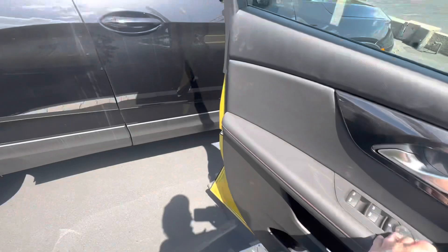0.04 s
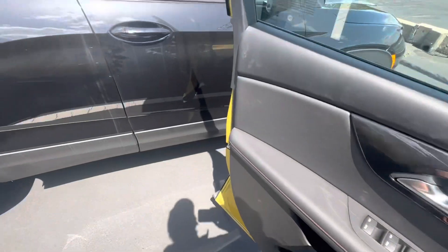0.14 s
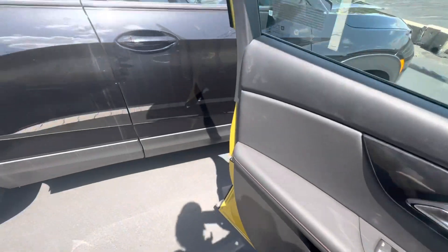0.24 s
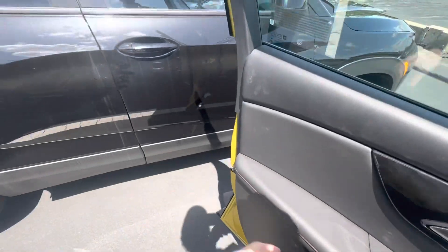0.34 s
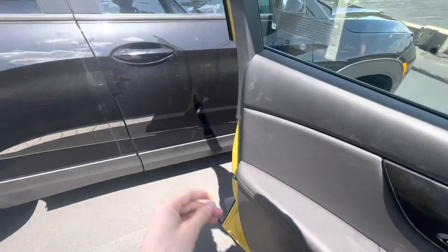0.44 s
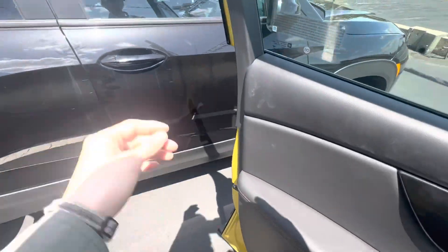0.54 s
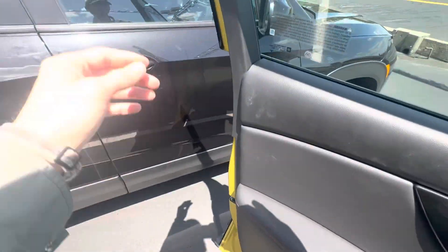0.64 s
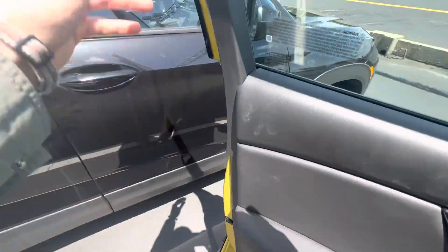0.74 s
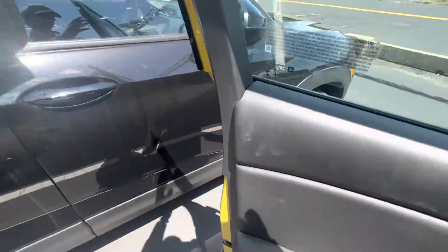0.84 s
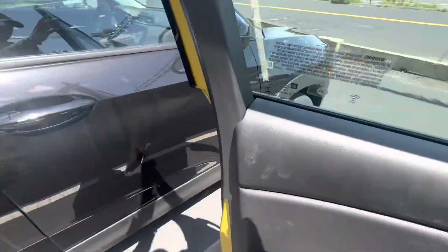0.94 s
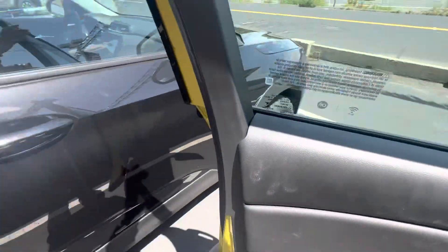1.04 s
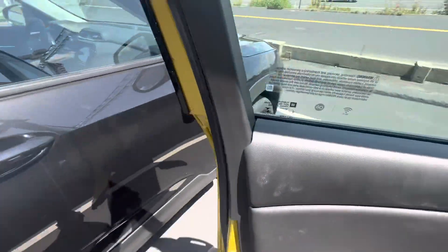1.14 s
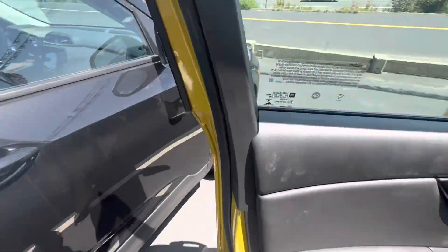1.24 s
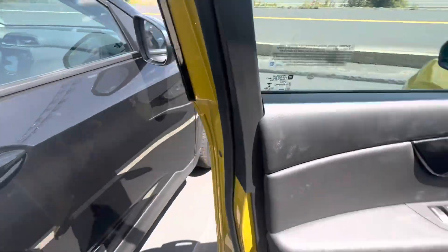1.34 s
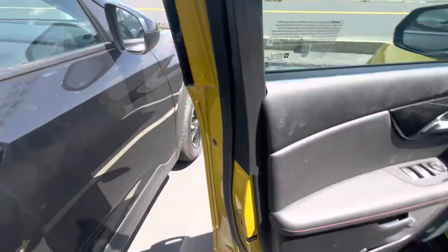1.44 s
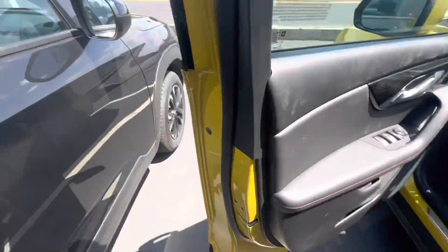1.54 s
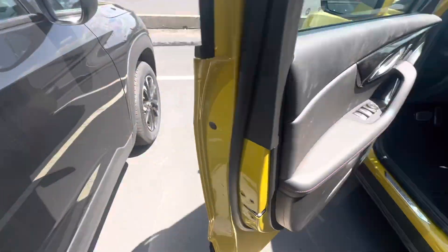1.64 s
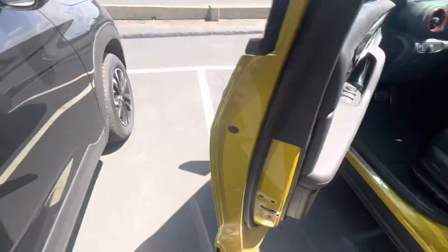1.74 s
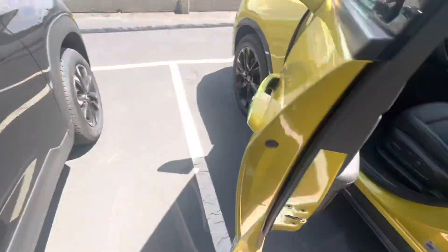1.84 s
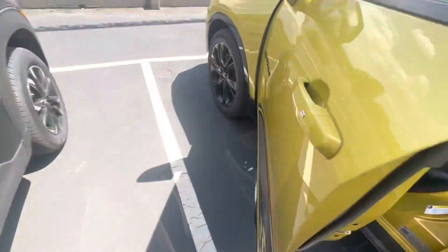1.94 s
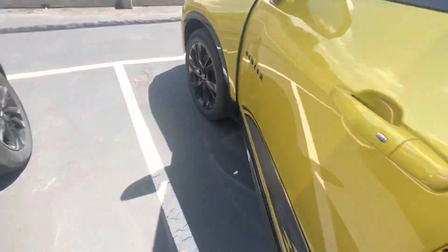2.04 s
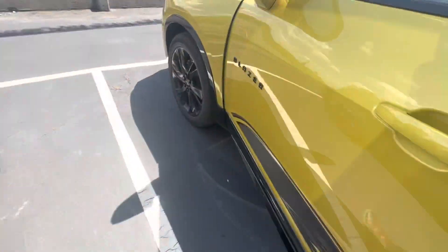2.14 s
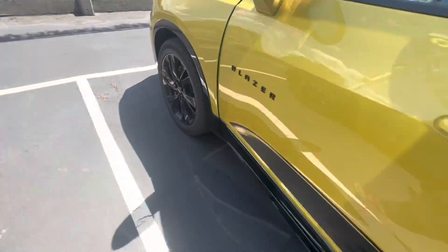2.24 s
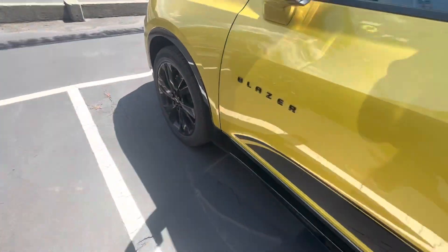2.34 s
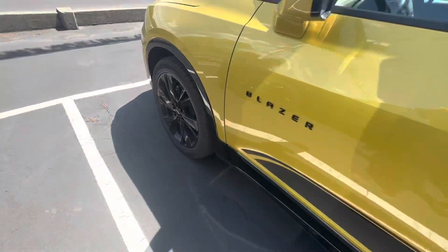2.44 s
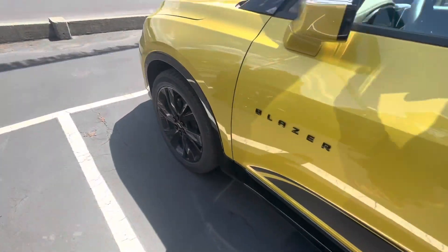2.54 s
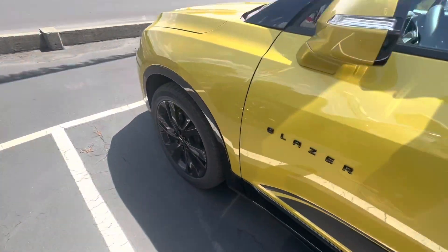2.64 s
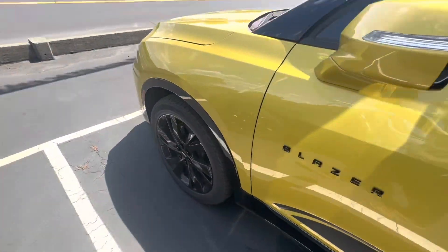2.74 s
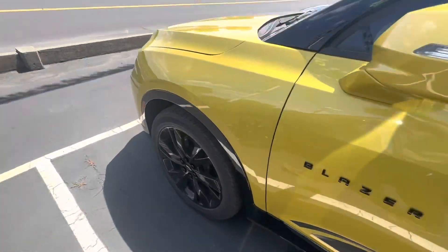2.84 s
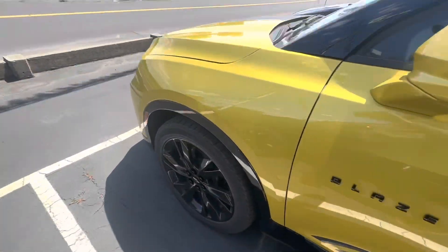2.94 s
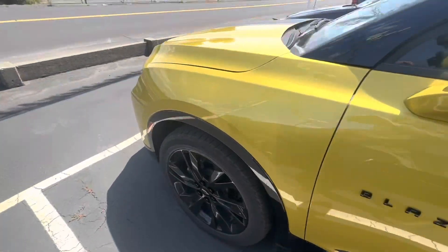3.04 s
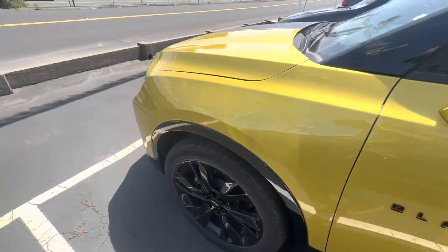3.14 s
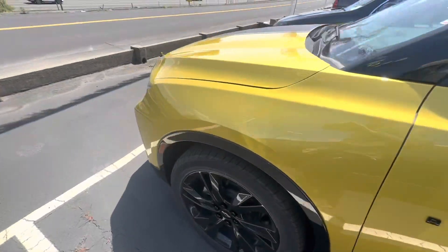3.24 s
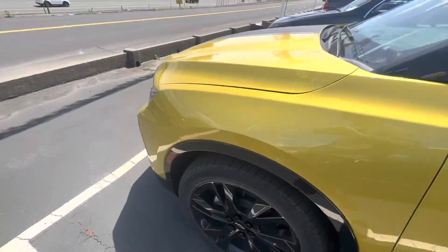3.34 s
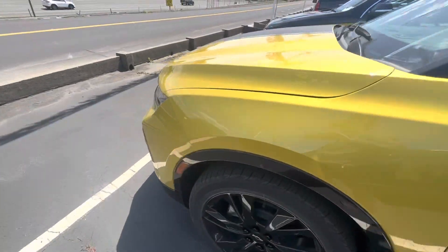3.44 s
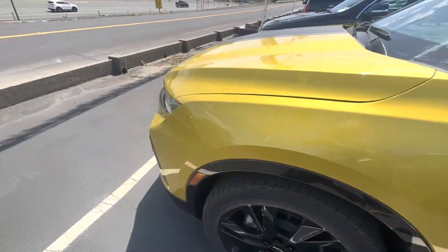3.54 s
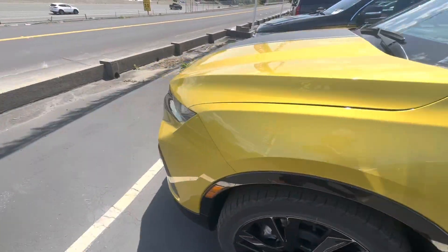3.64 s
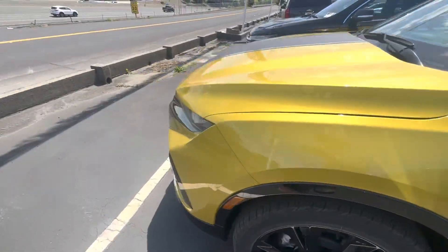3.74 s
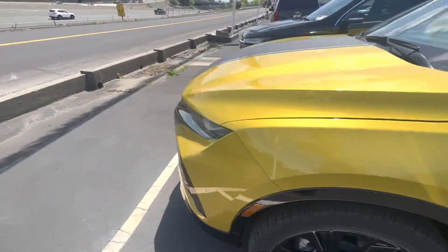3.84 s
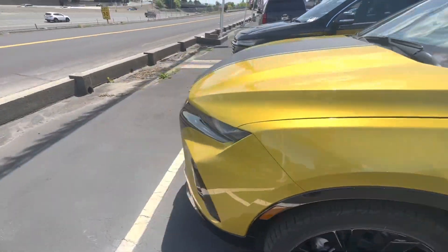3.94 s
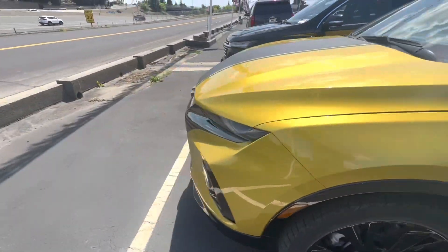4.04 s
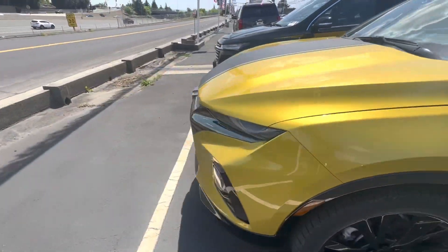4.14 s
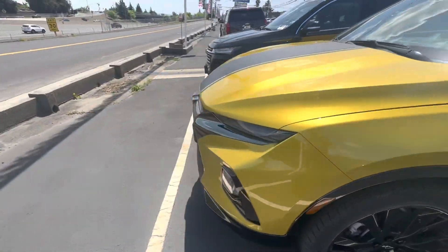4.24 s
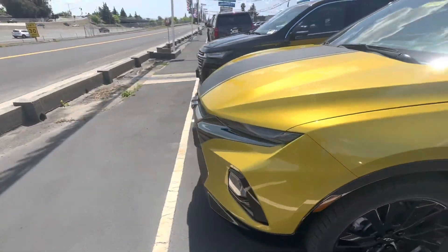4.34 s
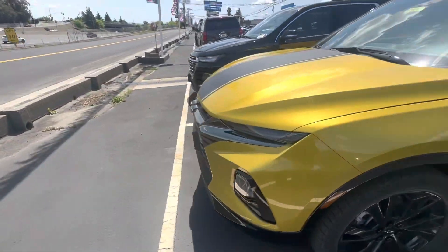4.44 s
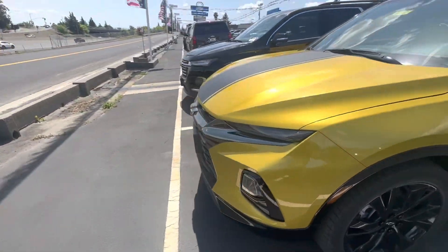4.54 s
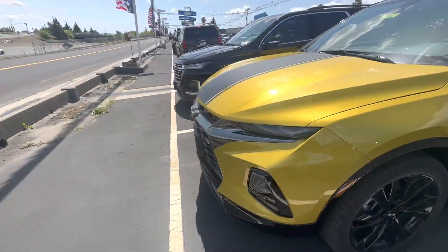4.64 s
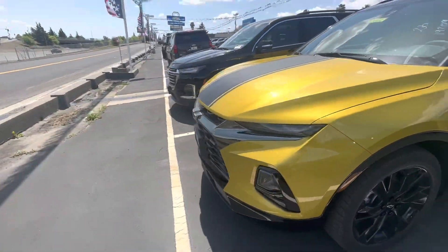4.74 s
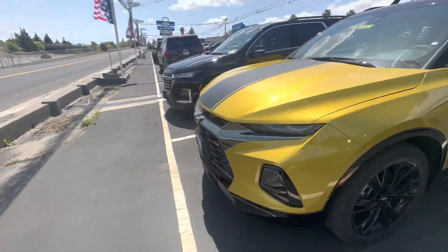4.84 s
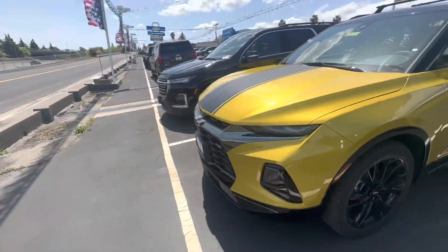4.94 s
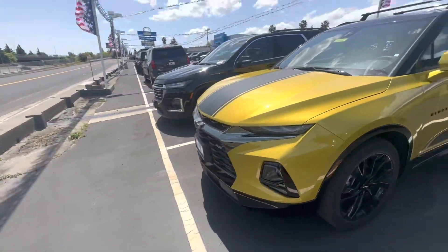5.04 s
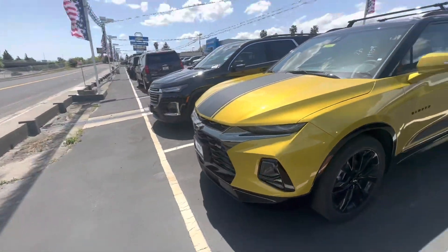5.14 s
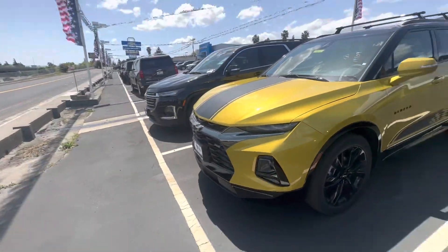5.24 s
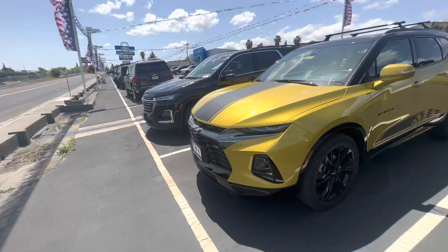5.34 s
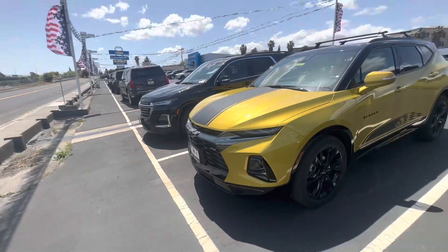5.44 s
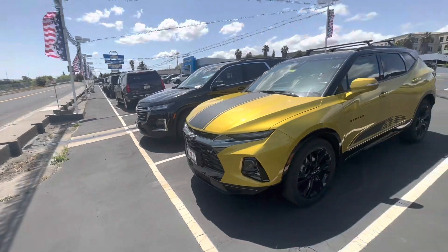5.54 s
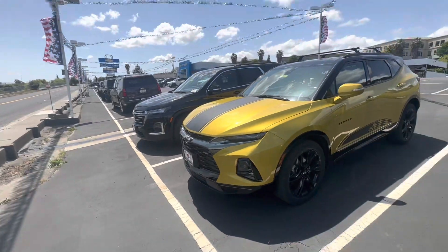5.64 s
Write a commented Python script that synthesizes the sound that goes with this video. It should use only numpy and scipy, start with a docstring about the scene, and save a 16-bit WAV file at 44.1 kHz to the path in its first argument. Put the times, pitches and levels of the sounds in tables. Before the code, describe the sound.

A handheld stereo microphone is outdoors in a car park beside a busy road. At first traffic is subdued and hollow, ringing between parked cars, with very faint hiss. Small bright ticks at 0.2 to 0.4 seconds and another near 0.85 accompany soft swishes of a hand on the door. A low whoosh swells around 1.5 as the door swings, with a tight cluster of hinge knocks at 1.45 and a single sharper one at 1.88. At about 2.37 the door slams: several blows within less than a tenth of a second merge into a solid thump, with snapping latch metal, a dry clack, short panel ring and deep cabin boom fading within half a second. From 2.6 onward the low road rumble and tyre roar grow broader, engine hums sink slightly in pitch while passing, the rumble dips briefly near 4.25, and approaching tyres drone around 5.5.

```python
"""A car door is swung shut: its latch snaps in a rapid run of blows, the panel rings and the cabin booms.
Struck resonators make the metal and the boom, filtered noise the clack; before it the stay knocks over its
detents amid noise-puff ticks and swishes. Behind lies a busy road, heard from a hand-held stereo microphone:
coloured noise for tyre roar, harmonics with falling pitch for passing engines, and moving noise bands for the
hollow ring between parked cars. The road grows as the microphone is carried out from between them."""
import sys
import numpy as np
from scipy import signal
from scipy.fft import rfft, irfft
from scipy.io import wavfile
from scipy.ndimage import map_coordinates

SR = 44100
rng = np.random.default_rng(int(sys.argv[2]) if len(sys.argv) > 2 else 0)


def dump(signal):
    """Clip the signal to [-1, 1] and save it as 16-bit WAV at the path in sys.argv[1]."""
    limited = np.clip(np.atleast_2d(signal).T, -1, 1)
    pcm = np.round(limited * 32767).astype(np.int16)
    wavfile.write(sys.argv[1], SR, pcm)


N = 251811
TIME = np.arange(N) / SR
FREQS = np.maximum(np.arange(N // 2 + 1) * SR / N, 1)
CUTOFF_HZ = 15900


def from_db(db):
    """Decibels to gain."""
    return 10 ** (np.asarray(db) / 20)


def in_time(rows):
    """Each column of a curve at every sample."""
    s, *columns = np.transpose(rows)
    return [np.interp(TIME, s, c) for c in columns]


def over_hz(points):
    """A spectrum table at every frequency, interpolated over log frequency."""
    hz, value = np.transpose(points)
    return np.interp(np.log(FREQS), np.log(hz), value)


def colour(x, gain):
    """Weight a steady sound by frequency."""
    return irfft(rfft(x) * gain, N)


def noise(gain):
    """Noise of the given colour, rms 1."""
    real, imaginary = rng.standard_normal((2, len(FREQS)))
    x = irfft(gain * (real + 1j * imaginary), N)
    return x / x.std()


def drift(rate_hz):
    """Random wander, mostly slower than the given rate, rms 1."""
    return noise(1 / (1 + (FREQS / rate_hz) ** 2))


def swing(rows):
    """A level curve at every sample, in dB about its mean."""
    level_db, = in_time(rows)
    return level_db - level_db.mean()


def hump(s, width_s):
    """A smooth rise to 1 at s and back."""
    return np.exp(-((TIME - s) / width_s) ** 2)


def until(s, width_s):
    """A smooth step from 1 down to 0 around s."""
    return (1 - np.tanh((TIME - s) / width_s)) / 2


def burst(s, t60, rise):
    """Envelope that jumps up at s and dies away by 60 dB per t60."""
    age = np.maximum(TIME - s, 0)
    decay = from_db(-60 * np.minimum(age / t60, 2))
    return (1 - np.exp(-age / rise)) * decay * (age < 2 * t60)


def at_ports(x, lead_ms):
    """A sound reaches the left microphone earlier than the right; a negative lead favours the right."""
    half = lead_ms * SR / 2000
    return np.array([map_coordinates(x, [np.arange(N) + side * half], order=5, mode="mirror")
                     for side in (1, -1)])


def resonance(hz, width_hz):
    """Noise ringing around a centre that may move, rms 1."""
    tone = (1 + (FREQS / width_hz) ** 2) ** (-3 / 2)
    phase = 2 * np.pi * np.cumsum(hz * np.ones(N)) / SR
    return noise(tone) * np.cos(phase) + noise(tone) * np.sin(phase)


def strike(times, blow_db, contact_s, modes):
    """Half-sine pushes set the modes of a body ringing; a longer contact sounds duller."""
    force, out = np.full(N, 1e-18), 0
    for s, db, length in np.broadcast(times, blow_db, contact_s):
        # even the hardest contact lasts three samples
        push = np.sin(np.linspace(0, np.pi, max(int(length * SR), 3)))
        force[round(s * SR):][:len(push)] += from_db(db) * push / push.sum()
    for hz, db, t60 in modes:
        radius, angle = from_db(-60 / (t60 * SR)), 2 * np.pi * hz / SR
        numerator = [0, from_db(db) * np.sin(angle)]
        denominator = [1, -2 * radius * np.cos(angle), radius * radius]
        out = out + signal.lfilter(numerator, denominator, force)
    return out


def thin_hiss(hiss_db=-65.0):
    """A faint steady hiss at the very top, alike in both ears."""
    tone = 1 / (1 + (13000 / FREQS) ** 16) * (FREQS < CUTOFF_HZ)
    return from_db(hiss_db) * noise(tone)


# bass of the road, filling in unevenly and then holding: t/s, level/dB (only the shape counts)
BASS_LEVEL = [(0.0, -49), (0.06, -75), (0.24, -61), (0.38, -40), (0.52, -85), (0.61, -48), (0.68, -61),
              (.85, -49), (1.2, -26.8), (1.31, -33), (1.54, -26.5), (1.61, -44), (1.75, -26.5), (2.3, -25),
              (2.55, -28.5), (2.9, -23.5)]


def bass_dip():
    """How far the bass lies under its final level, in dB."""
    level_db, = in_time(BASS_LEVEL)
    return level_db - level_db[-1]


# direction of the road: t/s, lead of the left microphone/ms, share that arrives directly/0-1
ROAD_BEARING = [(0, -0.53, 0.52), (1, -0.25, 0.3), (1.6, -0.31, 0.1), (2.1, 0.17, 0.1), (2.7, 0.36, 0.1),
                (3.4, 0.51, 0.45), (4.3, 0.45, 0.46), (5.7, 0.45, 0.85)]
# colour of the road noise: f/Hz, relative level per Hz/dB
ROAD_COLOUR = [(25, -44), (38, -65), (55, -50.5), (90, -44.5), (170, -51.5), (280, -54), (410, -59.5),
               (570, -56.5), (690, -55), (880, -58), (1300, -69), (1750, -71.5), (2200, -75), (2650, -76.5),
               (3100, -79.5), (6000, -77.5), (9500, -81.5), (15000, -99)]
# shading of the two ports: f/Hz, left minus right level/dB
PORT_SHADE = [(100, 0.5), (270, 2.5), (450, 3), (740, 5), (1220, 1.5), (2000, 1), (3300, 1.5), (5500, 9),
              (9000, 3.5), (15000, -5.5)]
# tyre roar, growing as the microphone leaves the shelter of the cars: t/s, level/dB (swing about its mean)
ROAR_LEVEL = [(0.0, -43.5), (1.22, -39.5), (2.19, -35.5), (2.6, -35.5), (3.1, -33), (3.59, -30),
              (4.89, -28.5), (5.7, -27.5)]
# treble of the road: t/s, level/dB (swing about its mean)
TREBLE_LEVEL = [(0.0, -45), (1.03, -52.5), (2.63, -52.5), (3.76, -51), (5.11, -50.5), (5.7, -51.5)]
# bands of the road noise: centre f/Hz, relative level/dB, shares of the bass, roar and treble swings
ROAD_BANDS = [(52, 5, 1.2, 0, 0), (121, 1.73, 0.8, 0, 0), (347, -3.5, 0.058, 0.9, 0.091),
              (710, -4, 0.012, 1.16, 0.38), (2140, -3, 0.0073, 0.68, 0.68), (5600, -10, 0.03, 0.045, 0.92)]
# the deepest rumble stays weak until the microphone is clear of the door
CLEAR_S, CLEARING_S, DEEP_LOSS_DB, DEEP_HZ = 2.2, 0.12, 14, 76
# the rumble dips briefly
LULL_S, LULL_WIDTH_S, LULL_DB = 4.255, 0.33, 2.5


def traffic(port_gap_ms=1.0, scatter_hz=5000, bass_alike=0.63, flutter_db=1.8, swell_db=0.4, smooth_hz=1500):
    """Road noise comes partly straight from the road, partly scattered from all round."""
    lead_ms, direct = in_time(ROAD_BEARING)
    low_cut = 1 / np.sqrt(1 + (36 / FREQS) ** 10)
    density = from_db(over_hz(ROAD_COLOUR)) * np.sqrt(SR / 2) * low_cut
    shade = from_db(np.outer([1, -1], over_hz(PORT_SHADE)) / 2)
    straight = rfft(at_ports(rng.standard_normal(N), lead_ms))

    # scattered sound is alike at both ports only while its waves are longer than their spacing
    alike = np.clip(bass_alike, 0, 1) * np.sinc(2 * FREQS * port_gap_ms / 1000)
    mid, side = rfft(rng.standard_normal((2, N)))
    scattered = np.sqrt((1 + alike) / 2) * mid + np.sqrt((1 - alike) / 2) * side * [[1], [-1]]

    bass_db = bass_dip() - LULL_DB * hump(LULL_S, LULL_WIDTH_S)
    swings_db = np.array([bass_db, swing(ROAR_LEVEL), swing(TREBLE_LEVEL)])
    sheltered_db = DEEP_LOSS_DB * until(CLEAR_S, CLEARING_S)
    out, centres = 0, np.transpose(ROAD_BANDS)[0]
    for (hz, db, *follows), own in zip(ROAD_BANDS, np.eye(len(ROAD_BANDS))):
        level_db = db + np.dot(follows, swings_db) - sheltered_db / (1 + (hz / DEEP_HZ) ** 4)
        # neighbouring bands crossfade over log frequency
        band = density * shade * np.interp(np.log(FREQS), np.log(centres), own)
        share = np.clip(direct / (1 + (hz / scatter_hz) ** 2), 0, 1)
        from_road = np.sqrt(share) * irfft(straight * band, N)
        from_around = np.sqrt(1 - share) * irfft(scattered * band, N)
        # the rumble heaves, the hiss stays smoother
        waver_db = (flutter_db * drift(21) + swell_db * drift(6.2)) / (1 + hz / smooth_hz)
        out = out + (from_road + from_around) * from_db(level_db + waver_db)
    return out


# lowest resonance, moving with the door and the microphone: t/s, f/Hz, level/dB (base for all modes)
GAP_PITCH = [(0, 620.5, -47), (.18, 560, -37), (.55, 589.5, -44.5), (1.05, 631, -41.5), (1.4, 738, -46.5),
             (1.62, 649, -47), (2.1, 625.4, -40.5), (2.6, 654, -43), (3.3, 662.5, -38.5), (4.2, 692, -45),
             (4.7, 762.6, -41.5), (5.7, 699, -39)]
# air between the parked cars: f/Hz (the first is the reference pitch), width/Hz, relative level/dB,
# share of the swell, exponent with which it follows the pitch shift
GAP_RESONANCES = [(650.6, 122, -1.5, 0.66, 1), (1066, 140, -8.5, 1.43, .25), (1282, 260, -11, 0.78, .2),
                  (2030, 210, -22, 1.5, .2)]
# the hollow ring swells and sinks again
GAP_SWELL_S, GAP_SWELL_WIDTH_S, GAP_SWELL_DB = 2.19, 0.91, 6.5


def between_cars(wander=0.0118, waver_db=2.5):
    """Road noise rings hollow between the flanks of the parked cars, at a pitch that shifts with the gap."""
    lowest_hz, level_db = in_time(GAP_PITCH)
    shift = lowest_hz / GAP_RESONANCES[0][0] * (1 + wander * drift(5.88))
    swell_db = GAP_SWELL_DB * hump(GAP_SWELL_S, GAP_SWELL_WIDTH_S)
    out = 0
    for hz, width_hz, db, share, follows in GAP_RESONANCES:
        gain = from_db(level_db + db + share * swell_db + waver_db * drift(7.3))
        # each port gets its own noise
        ring = np.array([resonance(hz * shift ** follows, width_hz) for port in range(2)])
        out = out + gain * ring
    return out


# vehicles going by: nearest t/s, firing f/Hz, speed/(m/s), distance/m, out of the cars' shadow t/s, waver/dB,
# fundamental level/dB, its gain ahead/dB, second harmonic level/dB, its gain ahead/dB (levels before the bass dip)
PASSING_VEHICLES = [(3.5, 77.1, 17, 13.92, 2.5, 1.3, -33, 6.6, -50, -14),
                    (4.253, 120.5, 23.3, 31.5, -4, 0.77, -24.5, 6.8, -37.5, -0.5),
                    (4.547, 168, 25.7, 38.6, 2.3, 0.4, -36.5, 2.5, -32, -10.5),
                    (4.699, 136.1, 20, 35, 3.5, 0.76, -38.5, 2, -41, 2.5),
                    (5.028, 140.1, 29, 16, 4.5, 1.1, -25, 0.67, -42, 9)]
SHADOW_DB, EMERGING_S = 9, 0.12   # screening by the parked cars, and how quickly it ends
SOUND_M_PER_S = 343


def engines(jitter=0.0019):
    """Exhaust harmonics of each vehicle: the pitch sinks as it goes by, the level follows distance and direction."""
    out = 0
    for nearest_s, firing_hz, speed, distance, emerges_s, waver_db, *harmonics in PASSING_VEHICLES:
        along = speed * (TIME - nearest_s)
        reach = np.hypot(along, distance)
        receding = along / reach   # -1 while approaching, 1 once gone
        hz = firing_hz / (1 + receding * speed / SOUND_M_PER_S)
        phase = 2 * np.pi * np.cumsum(hz * (1 + jitter * drift(8.5))) / SR
        shadow_db = SHADOW_DB * until(emerges_s, EMERGING_S)
        gain = distance / reach * from_db(waver_db * drift(10.0) - shadow_db)
        for k, (db, ahead_db) in enumerate(np.reshape(harmonics, (2, 2)), 1):
            out = out + np.sqrt(2) * gain * from_db(db - ahead_db * receding) * np.sin(k * phase)
    return out * from_db(bass_dip())


# tyres of an approaching car: loudest t/s, half length/s, centre f/Hz, width/Hz, level/dB
APPROACHING_TYRES = (5.5, .5, 485.5, 80, -30)


def near_tyres():
    """The tread of an approaching car drones in a narrow band of noise."""
    s, length, hz, width_hz, db = APPROACHING_TYRES
    return from_db(db) * hump(s, length) * resonance(hz, width_hz)


# the hand on the trim and the swinging door: t/s, level/dB, centre f/Hz, half length/s, width/log frequency ratio
DOOR_SWISHES = [(0.282, -50.5, 1350, 0.29, 0.77), (0.385, -40.5, 133, 0.05, 0.12),
                (.7, -48, 350, 0.32, 0.23), (1.16, -40, 65, .07, 0.52), (1.503, -34, 202, 0.16, 0.46)]


def swishes():
    """Soft swells of band-limited noise from handling the door."""
    out = 0
    for s, db, hz, length, width in DOOR_SWISHES:
        tone = np.exp(-(np.log(FREQS / hz) / width) ** 2 / 2)
        out = out + from_db(db) * hump(s, length) * noise(tone)
    return out


# small ticks and creaks of handling the door: t/s, level/dB, centre f/Hz, t60/s, width/log frequency ratio
HANDLING_TICKS = [(0.191, -28, 13000, 0.012, 0.46), (0.223, -32, 11000, .012, 0.48),
                  (.230, -36, 8950, 0.055, 0.4), (.2425, -42, 10000, .02, .3),
                  (0.247, -33, 9450, .035, 0.27), (.359, -38, 2000, .02, .9),
                  (0.8457, -29, 10400, 0.015, 0.96), (1.989, -41, 4000, .015, 0.89),
                  (2.545, -32, 1400, .025, 0.29)]


def ticks():
    """Brief dry ticks, each a puff of band-limited noise."""
    out = 0
    for s, db, hz, t60, width in HANDLING_TICKS:
        tone = 1 / (1 + (np.log(FREQS / hz) / width) ** 2)
        out = out + from_db(db) * burst(s, t60, rise=0.00084) * np.array([noise(tone), noise(tone)])
    return out


# knocks of the door stay over its detents: t/s, relative level/dB, contact/s
STAY_KNOCKS = [(1.4485, 0, .0002), (1.4548, -4, .0001), (1.462, -6, .0001), (1.8806, 1, .00005)]
# ringing of stay and hinge: f/Hz, level/dB, t60/s
STAY_RING = [(754, -28, .02), (1290, -40, .025), (1750, -37, .014), (2080, -35, .016), (2630, -34, .022),
             (3070, -33, .01), (4400, -44, .008), (6200, -41, .016), (7940, -39, .007)]


def door_stay(lead_ms=0.11):
    """The stay at the hinge knocks as the swinging door pulls it over its detents."""
    times, db, contact_s = np.transpose(STAY_KNOCKS)
    # neighbouring modes swing opposite ways
    knocks = sum((-1) ** k * strike(times, db, contact_s, [mode]) for k, mode in enumerate(STAY_RING))
    return at_ports(knocks, lead_ms)


# latch parts snapping over the striker: t/s, relative level/dB, contact/s, how far the latch is seated/0-1
LATCH_SNAPS = [(2.365, -1, 0.00045, .02), (2.3812, -8, .00005, 0), (2.3848, -10, .00007, 0),
               (2.4052, -5, .0004, 0.8), (2.409, -6, .00014, 0.93), (2.4160, -5, 0.00022, 0.74),
               (2.4240, -4.5, .00016, 0.9)]
# ringing of latch and striker: f/Hz, level while loose/dB, level when seated/dB, t60/s
LATCH_RING = [(990, -35, -37, .05), (1180, -36, -29, .07), (1250, -42, -23, 0.092), (1444, -40, -19, .07),
              (1600, -26, -28, .055), (1726, -23.5, -32, 0.055), (1820, -34, -34, 0.058),
              (2030, -28, -43, 0.04), (2380, -29, -32, 0.049), (2575, -47, -27.5, .07),
              (2670, -45, -41, .08), (2950, -46, -39, 0.029), (3700, -42, -36, .03),
              (5980, -25, -44, 0.043), (6360, -24, -43, 0.046)]


def latch():
    """The latch snaps over the striker in a rapid run of catches, ringing loose in the first snaps and seated
    in the later ones."""
    hz, loose_db, seated_db, t60 = np.transpose(LATCH_RING)
    out = 0
    for s, db, contact_s, seated in LATCH_SNAPS:
        mode_db = loose_db + np.clip(seated, 0, 1) * (seated_db - loose_db)
        out = out + strike([s], db, contact_s, zip(hz, mode_db, t60))
    return out


# blows of the closing door: t/s, push on the cabin level/dB, knock on the panel level/dB, panel contact/s,
# clack level/dB, clack t60/s (all levels relative)
DOOR_BLOWS = [(2.366, -37, -12.5, .0019, -18, .015), (2.3755, -32, -22, 0.00074, 0, 0.021),
              (2.3814, -11.5, -7.5, 0.00047, -1, 0.12), (2.385, -31, 1, 0.0019, -16, .03),
              (2.408, -7, -1, 0.0043, -1, .06), (2.417, -6.5, 1, .0022, -14, .05),
              (2.4254, -7, -17, 0.0005, -10, 0.13), (2.4361, -22, -3, .0021, -24, .05)]
# cabin air and door shell: f/Hz, level/dB, t60/s
CABIN_RING = [(53.3, 7, 0.35), (83.5, -23, .13), (163, -20.5, 0.12)]
# door skin, frame and trim: f/Hz, level/dB, t60/s
PANEL_RING = [(193, -17, .103), (271, -14.5, 0.184), (343, -10.5, 0.21), (378, -13, 0.052),
              (480, -7, 0.033), (540, -13, 0.062), (570, -10, .116), (713, -12.5, .071), (916, -23, .042)]
# colour of the latch and seal clack: f/Hz, relative level per Hz/dB
CLACK_COLOUR = [(250, 3), (500, 7), (900, -5.5), (1600, 3.5), (2500, -10), (3400, -5.5), (4800, -13.5),
                (6200, -18), (9300, -13.5), (12000, -35), (15000, -36)]


def door(clack_db=-22.5, clack_pan_db=-2.5, latch_pan_db=-4.5, lead_ms=-0.405, clack_alike=0.31,
         push_s=0.0066, clatter_db=2.5):
    """The frame slaps home, the latch clacks, the skin rings, and the seal squeezes the cabin air into a boom."""
    times, push_db, knock_db, contact_s, latch_db, latch_t60 = np.transpose(DOOR_BLOWS)
    boom = -strike(times, push_db, push_s, CABIN_RING)
    panel = strike(times, knock_db, contact_s, PANEL_RING)
    # negative pan favours the right port
    metal = at_ports(latch(), lead_ms) * from_db(latch_pan_db * np.array([[1], [-1]]))

    # each blow shakes the loose parts inside the door
    rattle = sum(from_db(db) * burst(s, t60, rise=.0005) for s, db, t60 in zip(times, latch_db, latch_t60))
    rattle = rattle * from_db(clatter_db * drift(350))
    tone = from_db(over_hz(CLACK_COLOUR)) / (1 + (200 / FREQS) ** 2)
    alike = np.clip(clack_alike, 0, 1)
    shared = np.sqrt(alike) * at_ports(noise(tone), lead_ms)
    separate = np.sqrt(1 - alike) * np.array([noise(tone), noise(tone)])
    # the low part of the clack favours the right port
    pan_db = clack_pan_db / (1 + (FREQS / 3200) ** 4)
    grain = colour(shared + separate, from_db(np.outer([1, -1], pan_db)))
    return at_ports(boom + panel, lead_ms) + metal + from_db(clack_db) * rattle * grain


def scene():
    """Traffic and its engines behind the nearby door."""
    lead_ms, _ = in_time(ROAD_BEARING)
    road = traffic() + between_cars() + at_ports(engines() + near_tyres(), lead_ms)
    handling = swishes() + ticks() + door_stay()
    return thin_hiss() + road + handling + door()


# stereo width of the microphone: f/Hz, gain of left minus right/dB
STEREO_WIDTH = [(60, -2), (130, 2.5), (260, 2), (600, 1), (1200, 2.5), (2500, -0.5), (9000, 1.5)]
LOW_CUT_HZ = 39.5   # the microphone loses the deepest bass


def record(dry):
    """The stereo width is shaped by frequency, deep bass is lost, the highest peaks are rounded, the top is cut."""
    side = colour((dry[0] - dry[1]) / 2, from_db(over_hz(STEREO_WIDTH)))
    wide = dry.mean(axis=0) + np.array([side, -side])
    lean = signal.sosfilt(signal.butter(4, LOW_CUT_HZ, "high", fs=SR, output="sos"), wide)
    rounded = lean / (1 + lean ** 8) ** (1 / 8)
    return signal.sosfilt(signal.ellip(10, .1, 90, CUTOFF_HZ, fs=SR, output="sos"), rounded)


dry = scene()
out = record(dry)
dump(out)
```